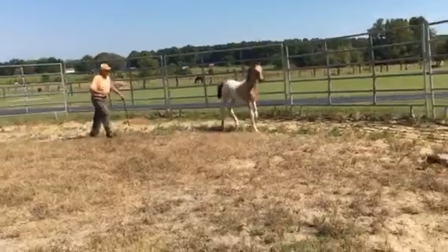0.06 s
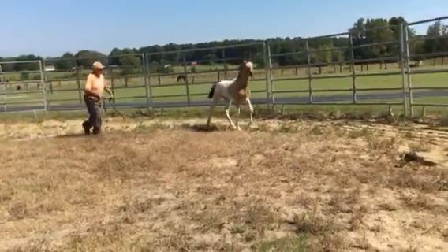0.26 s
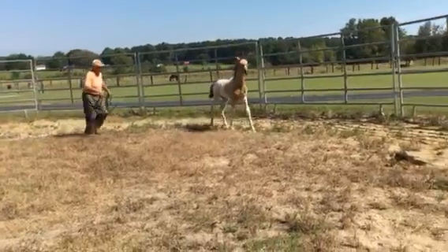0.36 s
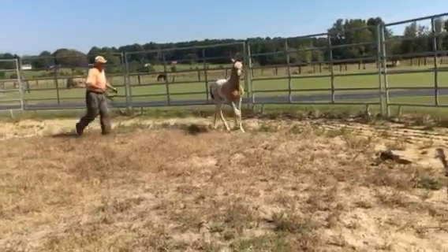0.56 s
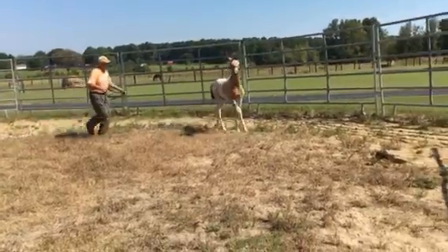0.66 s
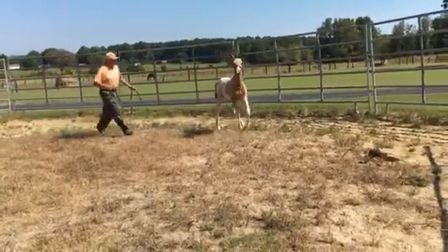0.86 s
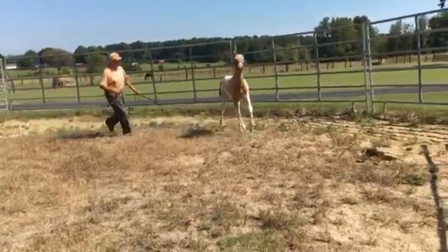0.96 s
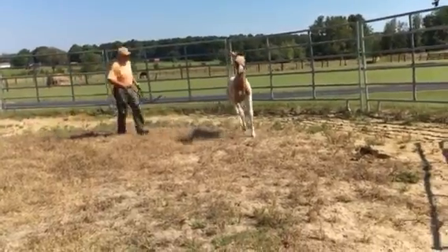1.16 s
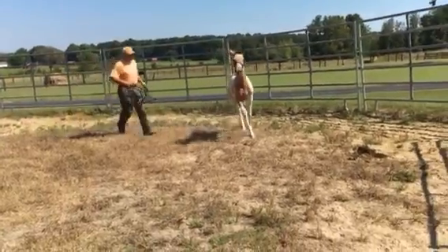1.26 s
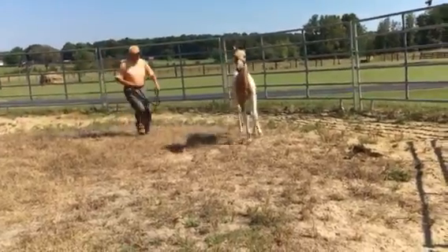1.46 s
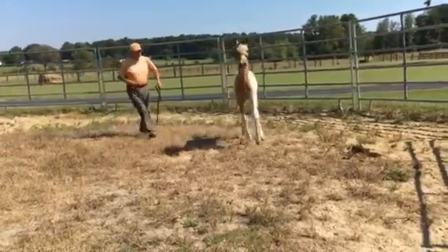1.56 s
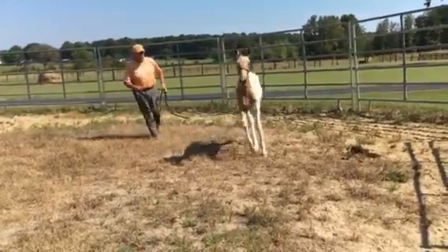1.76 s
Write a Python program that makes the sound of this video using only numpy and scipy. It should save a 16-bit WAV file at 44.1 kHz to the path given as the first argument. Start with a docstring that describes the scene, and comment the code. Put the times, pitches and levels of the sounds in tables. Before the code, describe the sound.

A young horse whinnies twice in quick succession, each call high, wavering and raspy, ending with a small nostril puff. Hoofs scuff softly on dry grass in an open paddock, while light wind brushes the microphone.

```python
"""A young horse whinnies twice while trotting over dry grass in an open paddock.
Each call is two voices at once: a high whistle that swings in arches and a lower, rough voice under it,
with air rushing through the larynx. Slack folds rattle slowly as each call begins and ends, and the
nostrils puff after the second. Hoofs scuff and thud, fence and trees echo faintly, and light wind
rumbles over a faint outdoor hiss."""
import sys
import numpy as np
from scipy import signal
from scipy.fft import rfft, irfft
from scipy.io import wavfile

SR = 44100
rng = np.random.default_rng(int(sys.argv[2]) if len(sys.argv) > 2 else 0)


def wrap_up_sound(samples):
    """Save the sound to the file named by the first command line argument, as 16-bit audio."""
    columns = np.atleast_2d(samples).T
    # keep every value between -1 and 1, then stretch to whole-number steps
    tamed = np.clip(columns, -1, 1)
    steps = np.round(tamed * 32767).astype(np.int16)
    wavfile.write(sys.argv[1], SR, steps)


N = 79380
TIME = np.arange(N) / SR


def amp(db):
    return 10 ** (np.asarray(db) / 20)


def unit(x):
    return x / np.sqrt(np.mean(x ** 2) + 1e-20)


def noise():
    return rng.standard_normal(N)


def fader(points):
    """Gain that rides through (time_s, level_db) points."""
    return amp(np.interp(TIME, *np.transpose(points)))


def gain_at(curve, hz):
    """Reads an EQ curve on a log-frequency axis."""
    freq_hz, level_db = np.transpose(curve)
    return amp(np.interp(np.log(hz + 1), np.log(freq_hz), level_db))


def colour(x, curve):
    """EQ that keeps the power of white noise."""
    gains = unit(gain_at(curve, np.fft.rfftfreq(2 * N, 1 / SR)))
    return irfft(rfft(x, 2 * N) * gains)[:N]


def wobble(hz):
    """Random drift up to about the given rate."""
    return unit(irfft(rfft(noise()) / (1 + (np.fft.rfftfreq(N, 1 / SR) / hz) ** 4), N))


def ring(x, hz, width_hz):
    """One resonance that keeps the power of white noise."""
    t = TIME[:2048]
    response = t * np.exp(-1.5 * np.pi * width_hz * t) * np.sin(2 * np.pi * hz * t)
    return signal.fftconvolve(x, response / np.linalg.norm(response))[:N]


def burst(start_s, decay_s, rise_s):
    """Envelope with a quick attack and an exponential decay."""
    t = np.maximum(TIME - start_s, 0)
    return (1 - np.exp(-t / rise_s)) * np.exp(-t / decay_s)


def follow(gain, amount, pivot_db=-37, fade_below_db=-50):
    """Tracks a call's level and stops with it; an amount under 1 flattens the swells."""
    pivot = amp(pivot_db)
    return pivot * (gain / pivot + 1e-12) ** amount * np.minimum(gain / amp(fade_below_db), 1)


# Tone of the distant hiss: freq_hz, level_db
HISS_EQ = [(100, 10), (250, 4), (450, -1), (620, 6.5), (800, 2), (1500, 0), (2300, 0.5), (2900, 4.5),
           (3500, -8), (4200, -10), (5000, -22.5), (7000, -24.5), (10000, -35.5), (15500, -37)]
# Tone of the wind rumble: freq_hz, level_db
WIND_EQ = [(20, -42.5), (40, -19), (66, 2), (110, -7), (160, -11.5), (230, -16.5), (350, -30.5),
           (1000, -55.5)]
# Rise and fall of the wind: time_s, level_db
GUSTS = [(0, -47), (.3, -52.5), (.7, -60), (1.0, -47), (1.3, -54.5), (1.6, -44), (1.8, -47)]
def outdoors(hiss_db=-53):
    """A bed of steady distant hiss, with light wind buffeting the microphone."""
    hiss = amp(hiss_db + 0.27 * wobble(hz=23)) * colour(noise(), HISS_EQ)
    wind = fader(GUSTS) * unit(colour(noise(), WIND_EQ))
    return hiss + wind


# Throat resonances under the rattle: freq_hz, width_hz, level_db
RATTLE_MODES = [(295, 80, -10), (655, 110, 3.5), (1410, 240, 4.5), (1780, 300, -4.5), (2500, 290, 1.5),
                (2900, 160, -3.5), (3500, 190, -9.5), (4270, 160, -14), (5750, 600, -24), (8600, 1000, -35)]
# Runs of rattle: start_s, length_s, rate_hz, first_db, middle_db, last_db, treble_db, chest_db
RATTLES = [(0.164, 0.045, 100, -48.5, -43, -40.5, -8.5, -8), (0.788, 0.044, 62.7, -38, -40, -45, -9, 0),
           (1.035, 0.088, 80, -44, -34.5, -32.5, 2.5, 3), (1.449, 0.037, 78, -43, -38.5, -42.5, -0.5, 5.5),
           (1.484, .046, 84, -39, -36, -34.5, -3, -0.5), (1.5327, 0.045, 93, -35.5, -34.5, -38.5, 4.5, 7)]
def rattle(start_s, length_s, rate_hz, first_db, middle_db, last_db, treble_db, chest_db):
    """Slack folds flap slowly; each flap is a click and a puff of air in the throat's resonances."""
    rise_s, decay_s, steady_air, puff_mix = .0004, .0024, .15, .42
    t = TIME - start_s
    gate = (t >= 0) & (t < length_s)
    flap_age = t % (1 / rate_hz)
    flaps = np.minimum(flap_age / rise_s, 1) * np.exp(-flap_age / decay_s)
    puffs = (flaps + steady_air) * noise() * gate
    clicks = 1. * (np.diff(flap_age, prepend=0) < 0) * gate
    drive = puff_mix * unit(puffs) + (1 - puff_mix) * unit(clicks)
    throat = 0
    for k, (hz, width_hz, db) in enumerate(RATTLE_MODES):
        shelf_db = treble_db * (hz > 2200) + chest_db * (hz < 1000)
        throat += (-1) ** k * amp(db + shelf_db) * ring(drive, hz, width_hz)
    level_db = np.interp(t, [0, length_s / 2, length_s], [first_db, middle_db, last_db])
    return unit(throat) * np.sqrt(gate.mean()) * amp(level_db)


# Crunch of dry grass: freq_hz, level_db
SCUFF_EQ = [(150, -13.5), (700, 0), (1700, 6.5), (2800, 8.5), (3500, -6.5), (4300, -6.5), (6500, -24.5),
            (15000, -43)]
# Low end of the soil: freq_hz, level_db
THUD_EQ = [(25, -27), (60, -14), (90, 1), (150, -5), (250, -11.5), (450, -20.5), (1500, -56)]
# Hoof hits: start_s, scuff_db, thud_db, scuff_decay_s, scuff_rise_s
STEPS = [(0.173, -55, -40, 0.06, .003), (0.813, -38.5, -40, 0.016, 0.0017),
         (0.864, -42.5, -76, 0.016, .004), (0.8992, -34, -45.5, 0.0021, 0.0004),
         (0.964, -31.5, -50, 0.014, .015), (1.062, -33.5, -36.5, 0.05, .01), (1.519, -40, -49, 0.02, .01),
         (1.593, -38, -68, 0.011, 0.0027), (1.635, -44, -57, 0.0073, 0.00064)]
def hoofs():
    """Each step crushes dry grass and thuds in the soil."""
    scuff = thud = 0
    for start_s, scuff_db, thud_db, scuff_decay_s, scuff_rise_s in STEPS:
        scuff += amp(scuff_db) * burst(start_s, scuff_decay_s, scuff_rise_s)
        thud += amp(thud_db) * burst(start_s, decay_s=0.034, rise_s=0.0016)
    return scuff * colour(noise(), SCUFF_EQ) + thud * colour(noise(), THUD_EQ)


# Throat formants of the low voice: freq_hz, level_db
THROAT_EQ = [(200, -34), (350, -27), (480, -30.5), (690, -22), (1050, -19), (1400, -24.5), (1750, -3),
             (2100, -15.5), (2450, -7), (2800, -4.5), (3080, -2.5), (3300, -27.5), (3650, -26), (4200, -33),
             (4750, -20), (5300, -35.5), (5850, -39.5), (6400, -47), (7700, -50.5), (8500, -51.5),
             (9200, -56), (9950, -54.5), (10800, -59.5), (15000, -54.5)]
def low_voice(pitch_hz, phase, gain, body_db):
    """Rough harmonics through the throat, turning chesty in the troughs of the pitch."""
    trough_hz, trough_width_hz, trough_lift_db = 360, 70, 12.5
    body_hz, blur_hz = 1500, 4000
    trough = np.exp(-((pitch_hz - trough_hz) / trough_width_hz) ** 2)
    body_gain = follow(gain, 0.98) * amp(body_db + trough_lift_db * trough)
    blur = wobble(hz=350)  # uneven cycles smear the high harmonics into breath
    voice = 0
    for k in range(1, 12):
        hz = k * pitch_hz
        in_body = 1 / (1 + (hz / body_hz) ** 8)
        level = (in_body * body_gain + (1 - in_body) * gain) * gain_at(THROAT_EQ, hz)
        voice += level * np.sin(k * phase + (hz / blur_hz) ** 3 * blur + rng.uniform(0, 2 * np.pi))
    return voice


def sidebands(high_hz, high_phase, low_hz, low_phase):
    """The two voices modulate each other, adding sum and difference tones in the throat."""
    return sum(gain_at(THROAT_EQ, k * high_hz + m * low_hz) * np.sin(k * high_phase + m * low_phase)
               for k in (1, 2) for m in (-1, 1))


# Throat colour of the rasp: freq_hz, level_db
RASP_EQ = [(200, -34), (450, -38), (650, -19.5), (900, -15), (1600, 0), (2100, 1.5), (2500, 10.5),
           (3050, 7), (3350, -4), (3700, -14.5), (4200, -2), (4900, -19), (5400, -20.5), (5850, -22),
           (6600, -39), (7800, -48.5), (8500, -35.5), (9200, -42.5), (9900, -35.5), (10700, -48.5),
           (12000, -47), (16000, -56)]
def rasp(phase, gain):
    """The low voice chops the airflow once a cycle."""
    return amp(-10.5) * follow(gain, 1) * colour(noise() * (1 + np.cos(phase)), RASP_EQ)


# Throat resonances that the whistle's overtones sweep through: freq_hz, level_db
OVERTONE_EQ = [(2100, -7.5), (2700, -17.5), (3050, -1.5), (3350, -7), (3700, -24.5), (4150, -5.5),
               (4450, -27.5), (4700, -16), (5200, -35.5), (5800, -20.5), (6500, -43.5), (7000, -45.5),
               (7500, -47.5), (8450, -30.5), (9100, -53), (10000, -46)]
# Overtone lift that opens the first call as a bright squeal: time_s, level_db
SQUEAL = [(.245, 6), (.285, 0)]
def whistle(pitch_hz, phase, gain, rough):
    """The high voice; as it roughens, its level shimmers more and harmonics 3 and 4 fade."""
    upper = amp(-5.5 - 9.5 * rough)
    overtones = sum(weight * gain_at(OVERTONE_EQ, k * pitch_hz) * np.sin(k * phase)
                    for k, weight in [(2, 1), (3, upper), (4, upper)])
    tone = gain * np.sin(phase) + follow(gain, 0.53) * fader(SQUEAL) * overtones
    return tone * (1 + (.05 + .3 * rough) * wobble(hz=130))


# Tone of the rushing air: freq_hz, level_db
AIR_EQ = [(300, -24), (1200, -7), (2000, 3), (2950, 18.5), (3500, 3), (4400, 0), (5500, -10), (7000, -16),
          (7900, -26.5), (8500, -19.5), (9200, -25), (9950, -18.5), (10700, -29.5), (12000, -28),
          (16000, -40.5)]
def air(gain):
    """Air rushes through the larynx while the whistle sounds."""
    return amp(-17.5) * follow(gain, 0.22) * colour(noise(), AIR_EQ)


def flutter(rough, rate_hz=78, spread=.35):
    """Tremolo from slack tissue flapping under the rough parts of a call."""
    turns = np.cumsum(rate_hz * (1 + spread * wobble(rate_hz))) / SR
    depth = .24 * rough
    return (1 + depth * np.cos(2 * np.pi * turns)) / np.sqrt(1 + depth ** 2 / 2)


def contour(points, glide_s=0.0057, fade_s=0.007):
    """Gliding pitch and gain of one voice, faded at both ends of the call."""
    time_s, pitch_hz, level_db = np.transpose(points)
    window = np.hanning(int(2 * glide_s * SR))
    bend_hz = np.interp(TIME, time_s, pitch_hz) - pitch_hz[0]
    glide_hz = pitch_hz[0] + signal.fftconvolve(bend_hz, window / window.sum(), "same")
    gate = np.clip(np.minimum(TIME - time_s[0], time_s[-1] - TIME) / fade_s + 1, 0, 1)
    return glide_hz, gate * amp(np.interp(TIME, time_s, level_db))


# Arches of the whistle, one list per call: time_s, pitch_hz, level_db
WHISTLE_ARCHES = [
    [(.215, 1003, -40), (.236, 1522, -39), (.261, 1766, -37.5), (.281, 1790, -38), (.301, 2034, -33.5),
     (.325, 2275, -27), (.35, 2311, -18), (.371, 2291, -24), (.391, 1877, -36.5), (.41, 2000, -32.5),
     (.436, 2305, -32), (.468, 2345, -17), (.491, 2330, -22.5), (.507, 2034, -35), (.525, 1654, -41),
     (.546, 2015, -33), (.571, 2285, -33.5), (.596, 2316, -19.5), (.617, 2310, -23.5), (.635, 2095, -38.5),
     (.65, 1627, -35), (.664, 1141, -38.5), (.675, 1030, -46), (.685, 1142, -62), (.7, 1625, -27),
     (.721, 2055, -34), (.742, 2129, -25.5), (.76, 2045, -35), (.776, 1736, -37.5), (.8, 1087, -45)],
    [(1.11, 1266, -35.5), (1.124, 1632, -26.5), (1.137, 1845, -29.5), (1.152, 1963, -45),
     (1.169, 1754, -26.5), (1.183, 1539, -27.5), (1.203, 1821, -36.5), (1.226, 2205, -24),
     (1.25, 2330, -20), (1.275, 2242, -24.5), (1.293, 1929, -42.5), (1.305, 1621, -21.5),
     (1.318, 1261, -37.5), (1.329, 1071, -51), (1.346, 1460, -29.5), (1.368, 1905, -33),
     (1.383, 2127, -31.5), (1.398, 2126, -25.5), (1.42, 2015, -44), (1.438, 1524, -25.5),
     (1.453, 1235, -36)],
]
# Arches of the low voice, one list per call: time_s, pitch_hz, level_db
VOICE_ARCHES = [
    [(.21, 360.3, -40), (.238, 503.5, -37), (.275, 600, -40.5), (.315, 743.3, -59), (.35, 780, -37),
     (.372, 750.5, -51.5), (.392, 615, -36), (.44, 760.1, -56.5), (.465, 765.6, -38), (.485, 768, -33),
     (.503, 728, -27), (.525, 555.3, -29), (.545, 643.3, -40.5), (.572, 770.2, -47.5), (.595, 751.3, -27),
     (.615, 715.2, -19.5), (.634, 643, -24.5), (.653, 520.3, -26), (.665, 372.3, -38.5), (.676, 346.4, -35),
     (.688, 399.5, -35.5), (.712, 645.3, -54.5), (.728, 704.8, -34), (.749, 684.7, -23),
     (.764, 657.1, -26.5), (.778, 569.9, -21.5), (.802, 371.6, -40)],
    [(1.102, 412.7, -35.5), (1.124, 567.9, -23.5), (1.138, 647.2, -26), (1.158, 655, -25.5),
     (1.182, 518.4, -25), (1.198, 563.4, -32), (1.218, 701.4, -49.5), (1.245, 770, -39.5),
     (1.272, 725, -32), (1.298, 596, -27), (1.316, 411.4, -38), (1.329, 352.7, -33.5), (1.35, 517.3, -37.5),
     (1.37, 662.8, -40), (1.396, 718.7, -31), (1.417, 653.5, -29), (1.431, 563, -23), (1.455, 420, -40)],
]
# Fader ride on rasp and air, held back as the first call opens: time_s, level_db
BREATH_RIDE = [(.24, -6), (.34, -2.5), (.385, 9.5), (.47, 7), (.52, 0), (1.45, 4)]
def whinny(whistle_points, voice_points, body_db):
    """Whistle, low voice and breath flutter together and ring a narrow resonance of the nose."""
    clean_hz, rough_hz, breathy_below_db = 2280, 1350, -36
    high_hz, high_gain = contour(whistle_points)
    low_hz, low_gain = contour(voice_points)
    rough = np.clip((clean_hz - high_hz) / (clean_hz - rough_hz), 0, 1)  # grows as the whistle drops
    jitter = wobble(hz=240)  # one pitch tremor shakes both voices
    high_phase = 2 * np.pi * np.cumsum(high_hz * (1 + (.003 + .009 * rough) * jitter)) / SR
    low_phase = 2 * np.pi * np.cumsum(low_hz * (1 + .007 * (1 + rough) * jitter)) / SR
    high = whistle(high_hz, high_phase, high_gain, rough)
    low = amp(-.5) * low_voice(low_hz, low_phase, low_gain, body_db)
    low += amp(-5) * low_gain * sidebands(high_hz, high_phase, low_hz, low_phase)
    low *= 1 + .2 * wobble(hz=130)  # shimmer
    voiced = np.minimum(low_gain / amp(breathy_below_db), 1)
    breath = (rasp(low_phase, low_gain) + air(high_gain)) * fader(BREATH_RIDE)
    call = flutter(rough) * (np.sqrt(2) * (high + voiced * low) + breath)
    nose = amp(-29) * ring(call, hz=3020, width_hz=89)
    return call + nose


def paddock_echo(x, level_db=-22.5, t60_s=0.76, predelay_s=0.047, taps_per_s=1500):
    """Sparse, faint reflections from fence and trees."""
    taps = noise() * (rng.random(N) < taps_per_s / SR)
    taps *= (TIME > predelay_s) * amp(-60 * TIME / t60_s)
    return amp(level_db) * signal.fftconvolve(x, taps / np.linalg.norm(taps))[:N]


# Nostril puffs that close the second call: start_s, level_db, centre_hz
SNORTS = [(1.5794, -23.5, 2727), (1.601, -31.5, 2700)]
def snorts():
    """Short puffs of air ring the nose."""
    return sum(amp(db) * ring(noise() * burst(start_s, decay_s=0.0025, rise_s=0.00018), hz, width_hz=480)
               for start_s, db, hz in SNORTS)


def scene():
    """Mono mix: the horse and its echo over the outdoor bed."""
    horse = whinny(WHISTLE_ARCHES[0], VOICE_ARCHES[0], body_db=2.5)
    horse += whinny(WHISTLE_ARCHES[1], VOICE_ARCHES[1], body_db=5.5)
    horse += sum(rattle(*run) for run in RATTLES) + snorts() + hoofs()
    return (horse + paddock_echo(horse) + outdoors())[None]


def record(dry, cutoff_hz=15750):
    """A steep low-pass trims the very top."""
    lowpass = signal.firwin(511, cutoff_hz, window=("kaiser", 9), fs=SR)
    return signal.oaconvolve(dry, lowpass[None], "same")


dry = scene()
out = record(dry)
wrap_up_sound(out)
```